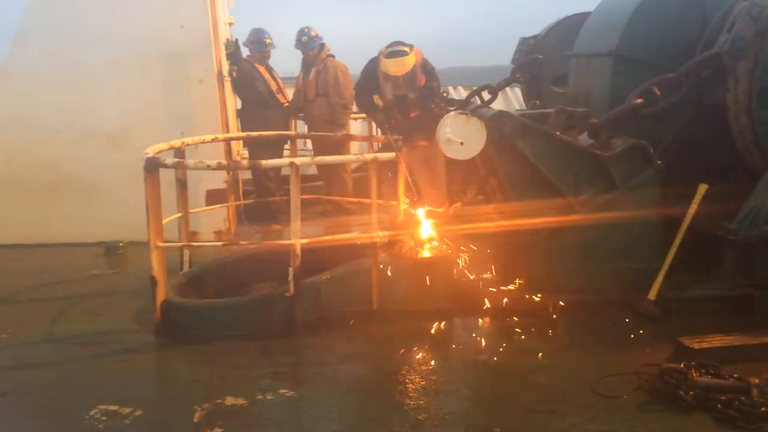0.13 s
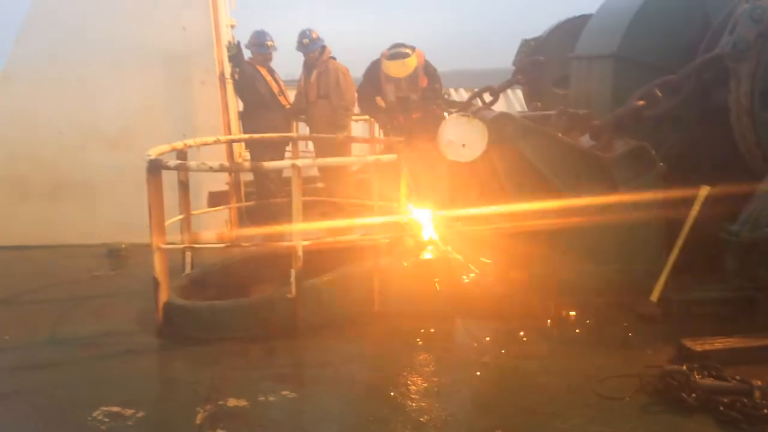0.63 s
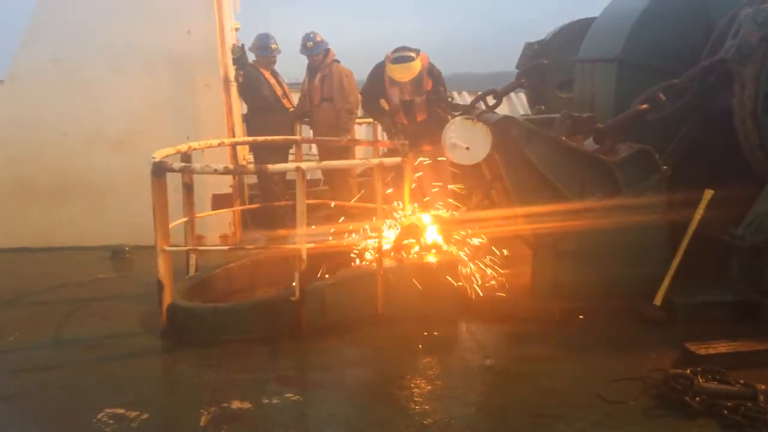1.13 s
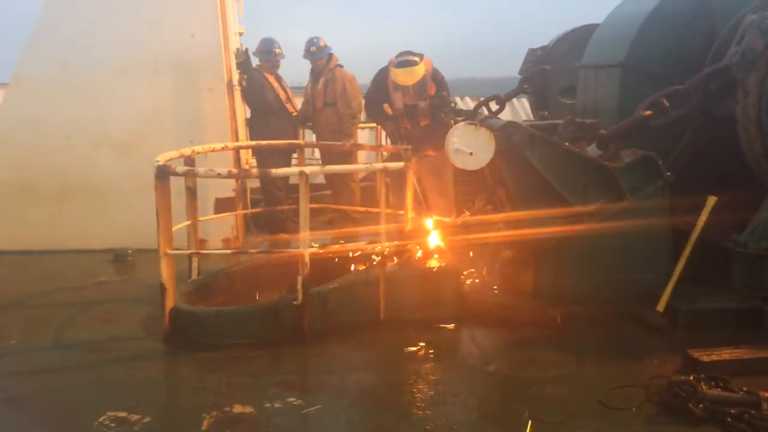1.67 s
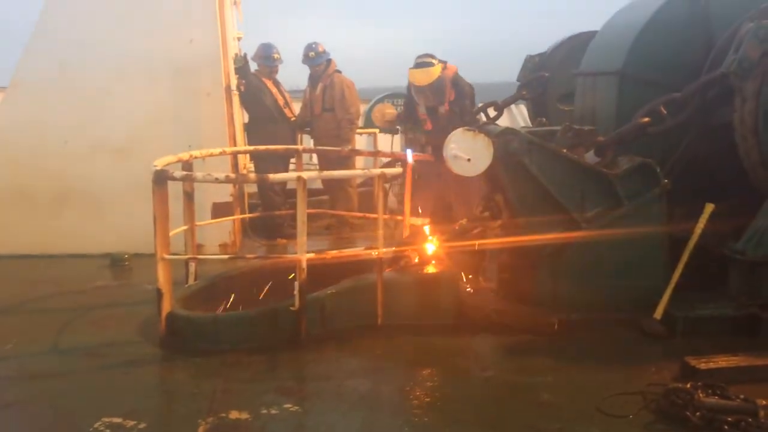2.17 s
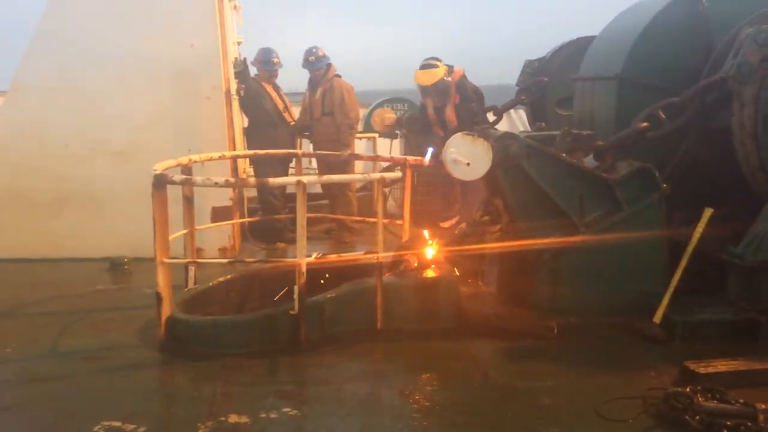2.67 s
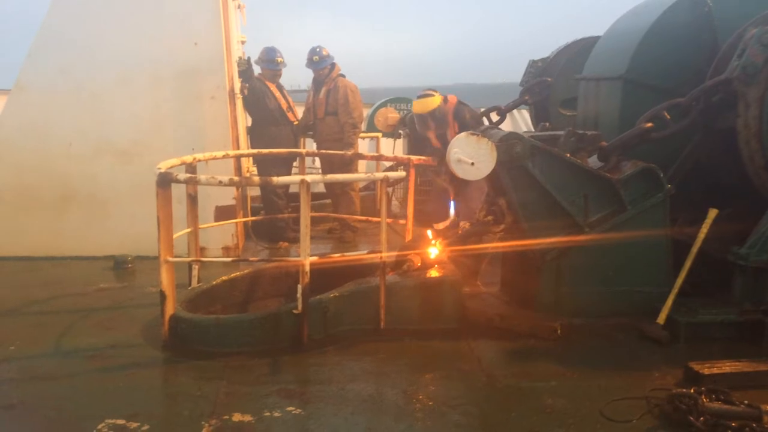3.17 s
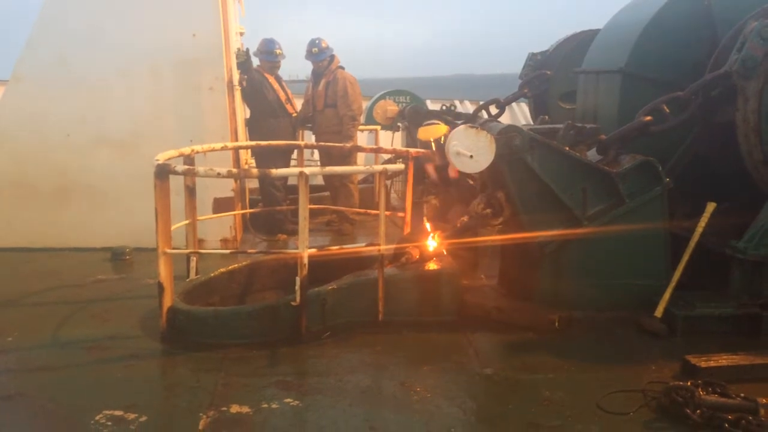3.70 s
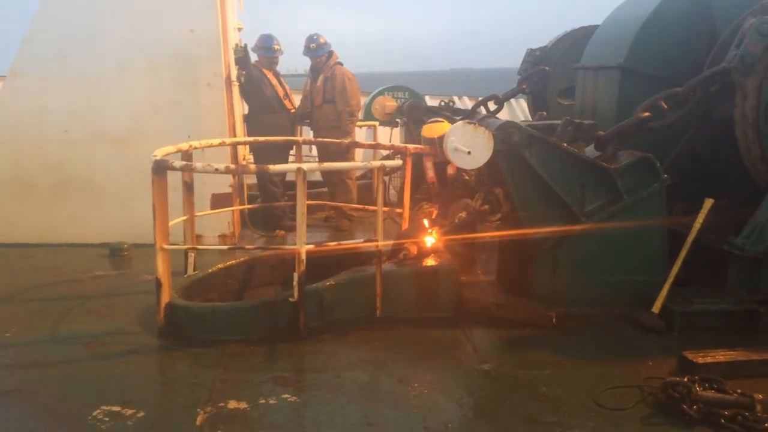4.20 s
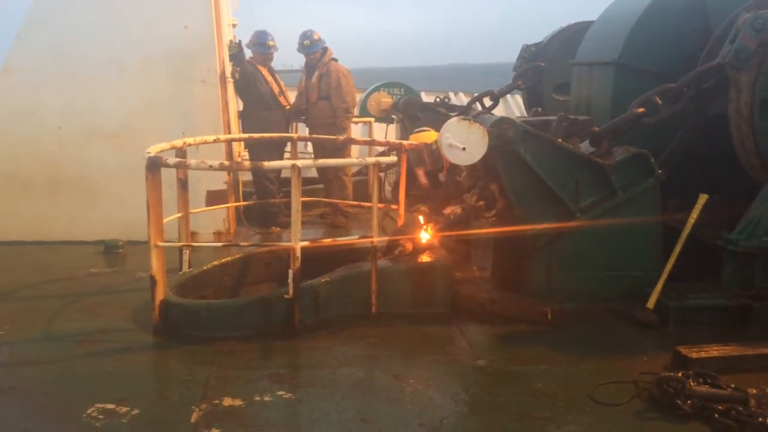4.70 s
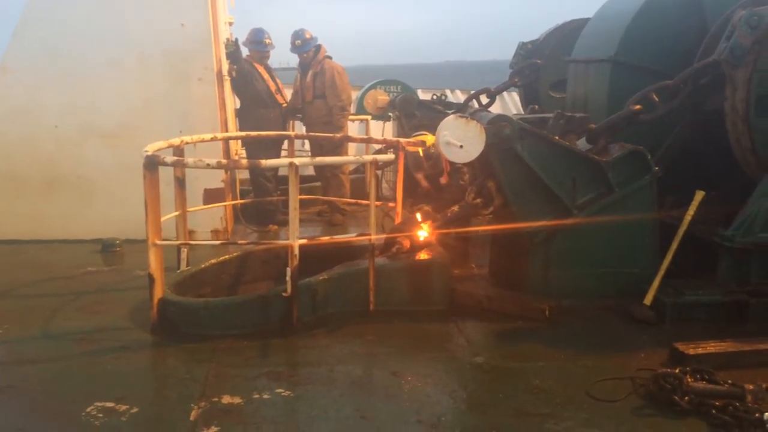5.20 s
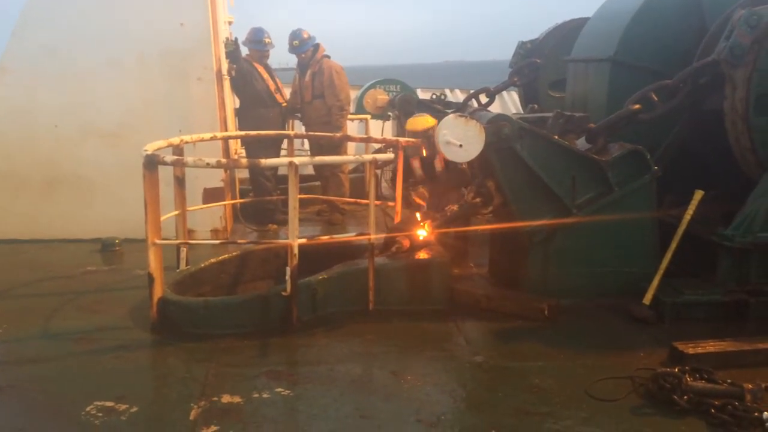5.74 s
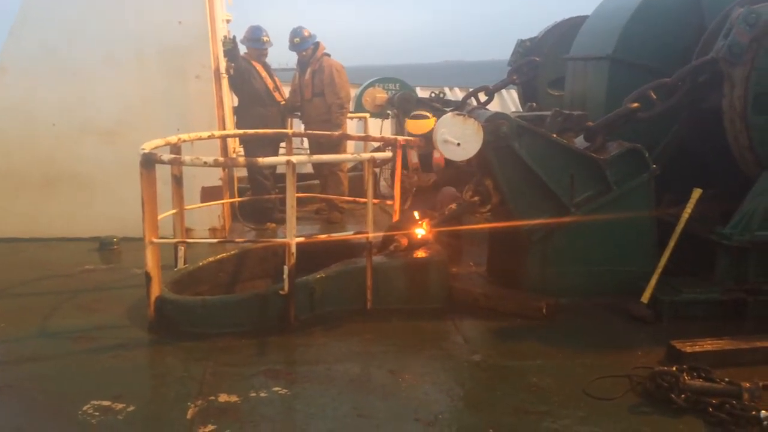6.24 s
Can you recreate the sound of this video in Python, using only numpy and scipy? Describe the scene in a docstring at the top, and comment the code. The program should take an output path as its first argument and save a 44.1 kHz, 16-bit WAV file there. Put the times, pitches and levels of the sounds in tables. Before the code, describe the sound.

A gas cutting torch is already roaring at 0 s on an open ship deck: loud, continuous turbulent hiss, strongest around 3 kHz, band-limited and mono, with hollow comb colouring from the steel and a short scattered echo. It flutters quickly, with small flares around 0.2, 0.4, 0.8 and 1.1 s and a broader swell near 1.7 s. At about 2.0 s it jumps louder, with a strong flare at 2.3 s, as the torch is lifted and swung; its hollow tone slides. From 3 to 5 s it is somewhat softer and duller, still wavering. Low wind rumble and soft thumps come in irregular gusts, heavy around 0.7-1.0, 1.8-2.3 and 3.7-4.4 s. At 5.22 s the flame snaps out with a tiny pop, a brief thin gas bleed and quick echo decay. Then only low wind buffets and very faint sea and machinery wash remain, with a tiny metal tick at 6.34 s.

```python
"""Open steel deck: a gas torch roars, is lifted and swung about, then snaps out with a pop; a metal tick follows.
The jet is shaped noise, combed by its bounce off the deck, with a sparse tail of echoes from the steel.
Wind is lumpy low noise plus single eddies; sea and machinery are a faint, patchy noise wash.
A small mono microphone, whose port rings near 3 kHz, colours all but the wind."""
import sys
import numpy as np
from scipy import signal
from scipy.io import wavfile
from scipy.ndimage import uniform_filter1d

SR = 44100
rng = np.random.default_rng(int(sys.argv[2]) if len(sys.argv) > 2 else 0)


def linear_from_db(decibels):
    """Turn decibels (scalar or array-like) into linear amplitude factors; 0 gives 1."""
    return 10 ** (np.asarray(decibels, float) / 20)


def store_pcm(level_fs):
    """Save levels as 16-bit WAV."""
    pcm = np.round(np.clip(level_fs, -1, 1) * 32767).astype(np.int16)
    wavfile.write(sys.argv[1], SR, np.atleast_2d(pcm).T)


N = 280476


def evened(x):
    """Scales to rms 1."""
    return x / np.sqrt(np.mean(x ** 2) + 1e-20)


def read(points, hz):
    """Interpolates a spectrum on a log-frequency axis."""
    f, value = np.transpose(points)
    return np.interp(np.log(hz + 1), np.log(f + 1), value)


def follow(rows, t):
    """Columns of a curve at times t."""
    s, *columns = np.transpose(rows)
    return [np.interp(t, s, c) for c in columns]


def grid(size):
    """Frequencies (column) and frame times (row) of short-time spectra."""
    hz = np.fft.rfftfreq(size, 1 / SR)[:, None]
    t = np.arange(4 * N // size + 5) * size / 4 / SR
    return hz, t


def blotches(hz, t, width_hz, length_s):
    """Random field of rms 1 with patches of the given size."""
    field = rng.standard_normal((len(t), len(hz))).T
    field = uniform_filter1d(field, max(1, round(width_hz / hz[1, 0])), 0)
    return evened(uniform_filter1d(field, max(1, round(length_s / t[1])), 1))


def noise(magnitude):
    """Noise whose short-time spectra have this magnitude; flat 1 gives rms 1."""
    real, imag = rng.standard_normal(magnitude.shape[::-1] + (2,)).T
    white = real + 1j * imag
    size = 2 * len(magnitude) - 2
    _, both = signal.istft([white, white * magnitude], nperseg=size, noverlap=3 * size // 4)
    flat, shaped = both[:, :N]
    return shaped / flat.std()


# flame flares: t/s (centre), lift/dB, half length/s (to 1/e), extra treble/dB
FLARES = [(0.123, 1, 0.071, 7), (0.196, 5, 0.034, -10.5), (0.413, 3, .03, -3), (.48, 3.5, 0.075, 0),
          (0.615, 2, 0.046, -1), (0.785, 3, 0.041, -4), (1.112, 4.5, 0.058, 0.5), (1.35, 3, .05, -1),
          (1.66, 3.5, 0.21, -4), (2.075, 1.5, 0.037, .1), (2.278, 7.5, 0.045, -8), (2.367, .5, 0.036, 4),
          (2.6, 1, 0.06, -1), (2.81, 3.5, 0.056, 3.5), (2.9, 1, .05, 1.5), (3.2, 2.5, 0.045, 0),
          (3.353, 2.5, .1, 2.5), (3.627, 3.5, 0.082, -1), (4.004, -0.5, .06, 1), (4.501, 2.5, 0.05, -2),
          (4.88, -1, .04, 0)]
# band response: dB per dB of aim, dB per dB of roar, share of a flare missed (0-1)
ROAR, MIDDLE, UPPER, TREBLE = (-0.65, 1.01, 1), (-0.2, 0.35, 0.34), (0.6, .1, .1), (0.5, 0.19, .01)


def jet_gain_db(hz, t, level_db, aim_db, roar_db):
    """Jet spectrum over time: flares lift it, aim and roar recolour four bands."""
    s, lift_db, half_s, treble_db = np.transpose(FLARES)[:, :, None]
    bump = np.exp(-((t - s) / half_s) ** 2)
    flare_db = (lift_db * bump).sum(0)

    def bell(centre_hz, width):
        return np.exp(-(np.log(hz / centre_hz + 0.014) / width) ** 2)

    high = 1 / (1 + (6000 / (hz + 1)) ** 4)
    low = 1 / (1 + (hz / 1700) ** 4)
    bands = [(high, TREBLE), (low, ROAR), (bell(2200, 0.28), MIDDLE), (bell(4500, 0.24), UPPER)]
    colour_db = high * (treble_db * bump).sum(0)
    for band, (aimed, roaring, missed) in bands:
        colour_db = colour_db + band * (aimed * aim_db + roaring * roar_db - missed * flare_db)
    return level_db + flare_db + colour_db


# jet drive: t/s, level/dB, aim/dB (towards us bright, away dull), roar/dB (flame against steel)
JET = [(0, -25.5, 2, -4), (.3, -27, 1.3, 2.5), (.6, -25.5, 0.93, -2), (.9, -27.5, 1.3, 0.5),
       (1.5, -26.5, 0.1, 0.5), (1.93, -28.5, -0.71, -1), (2.04, -22, -0.74, 0), (2.2, -23.5, 1.1, 0.5),
       (2.45, -25.5, .5, -1), (2.95, -26.5, 0.5, 0.5), (3.1, -27.5, 0.1, 0), (3.55, -29, -0.49, 3.5),
       (3.85, -29, -0.23, 1.4), (4.2, -28.5, -1.5, 1.5), (4.75, -27.5, -2.3, -0.4), (5.05, -28.5, -2, 6),
       (5.21, -28.5, -0.73, .1)]
# deck bounce, set by tip height: t/s, extra path/ms, share of direct sound (0-1)
BOUNCE = [(0, 0.9, 0.53), (.3, 0.95, .2), (1.1, 0.85, 0.25), (1.85, 0.82, 0.12), (2.05, 1.1, 0.5),
          (2.3, 1.75, 0.34), (2.55, 1.66, 0.7), (2.72, 1.6, 0.25), (2.9, 1.63, .55), (3.1, 1.45, 0.5),
          (3.3, 1.09, 0.5), (3.45, 0.9, 0.32), (3.7, 0.86, 0.2), (3.9, 1.1, 0.02), (4.12, 1.35, 0.22),
          (4.3, 1.08, 0.3), (4.55, 0.87, 0.02), (4.95, 0.6, 0.25)]
BOUNCE_HZ = 2920  # the rough deck scatters what lies above
SHUT_S = 5.222  # flame out
BLEED_DB, BLEED_S = -2.5, 0.027  # gas left in the nozzle; gain on the twice-differenced hiss


def jet():
    """Turbulent hiss, combed by its bounce off the deck, fluttering as the flame tears."""
    hz, t = grid(size=512)
    gain_db = jet_gain_db(hz, t, *follow(JET, t))
    tearing_db = 0.8 * blotches(hz, t, 400, .12)
    tearing_db += 0.63 * blotches(hz, t, 8000, .012)
    tearing_db += 0.98 * blotches(hz, t, 1500, .05)
    path_ms, share = follow(BOUNCE, t)
    reflected = share / (1 + (hz / BOUNCE_HZ) ** 2)
    comb = abs(1 + reflected * np.exp(-2j * np.pi * hz * path_ms / 1000))
    hiss = noise(comb * linear_from_db(gain_db + tearing_db))
    after_s = np.arange(N) / SR - SHUT_S
    thin = np.diff(hiss, n=2, prepend=[0, 0])  # thin and bright
    bleed_fade = np.sqrt(np.clip(1 - after_s / BLEED_S, 0, 1)) * (after_s > 0)
    flame = hiss * np.clip(-after_s / 0.0021, 0, 1)
    return flame + thin * linear_from_db(BLEED_DB) * bleed_fade


YARD_DB, YARD_T60_S = -4.5, 0.22  # tail energy re dry; decay before treble tilt
SHIFT_S = 0.2483  # torch motion changes the echo pattern in this time


def deck(x):
    """Adds a sparse tail of echoes, drawn anew for each stretch of the torch's motion."""
    out = np.pad(x, (0, 2 * SR))
    hop, t = round(SHIFT_S * SR), np.arange(SR // 4) / SR
    fade = np.sqrt(np.hanning(2 * hop))
    padded = np.pad(x, 2 * hop)
    for start in range(-hop, N, hop):
        echoes = rng.choice([-1., 1.], len(t)) * (rng.random(len(t)) < 5000 / SR)  # about 5000 per s
        decay = (t > .002) * linear_from_db(-60 * t / YARD_T60_S)
        tail = signal.lfilter([1, -.2], 1, echoes * decay)  # small steel parts favour treble
        tail = linear_from_db(YARD_DB) * tail / np.linalg.norm(tail)
        part = padded[start + 2 * hop:][:2 * hop] * fade
        wet = signal.fftconvolve(part, tail)[max(0, -start):]
        out[max(0, start):][:len(wet)] += wet
    return out[:N]


# microphone port response to broad hiss: f/Hz, relative level/dB
PORT = [(180, -37.5), (300, -21), (434, -21), (476, -15), (608, -15), (1330, -9.5), (1550, -8),
        (2110, -7.5), (3010, 0), (3300, 0.5), (3560, -1), (3840, -6.5), (4770, -10.5), (5910, -18.5),
        (11800, -35), (15300, -63), (22000, -120)]


def port(x):
    """Minimum-phase colour of the microphone port, unit energy: white noise keeps its power."""
    gain_db = np.maximum(read(PORT, abs(np.fft.fftfreq(4096, 1 / SR))), -100)
    log_gain = np.log(linear_from_db(gain_db))
    taps = np.fft.ifft(np.exp(np.conj(signal.hilbert(log_gain)))).real[:2048]
    return signal.oaconvolve(x, taps / np.linalg.norm(taps))[:N]


# far sea and machinery, before tilt and port: t/s, level/dB
WASH = [(5.3, -53.5), (5.39, -51), (5.6, -52.5), (5.645, -50.5), (5.77, -55.5), (6.3, -55)]
# wash spectrum before the port: f/Hz, level/dB
WASH_TILT = [(250, 18), (500, 19), (1000, 8.5), (2000, 3.5), (4000, -0.5), (8000, 3), (12000, 4.5)]


def wash():
    """Smooth distant noise, a little patchy."""
    hz, t = grid(size=1024)
    level_db, = follow(WASH, t)
    patches_db = 0.5 * blotches(hz, t, 600, 0.031)
    return noise(linear_from_db(level_db + read(WASH_TILT, hz) + patches_db))


# gusts: t/s (start), length/s, level/dB (at start, before rumble trim), upper rumble lift/dB
GUSTS = [(0, 0.39, -35.5, 3.5), (.38, 0.093, -30, -4), (.48, .12, -37.5, 1), (0.636, 0.39, -28.5, -3),
         (1.098, 0.05, -30.5, -15), (1.397, .1, -36, -2), (1.55, .14, -33, -9), (1.817, 0.16, -28, .5),
         (2.059, 0.27, -27, -6.5), (2.74, 0.043, -29.5, -9.5), (2.9, 0.16, -38.5, 2),
         (3.08, 0.13, -34.5, -6), (3.25, 0.26, -38, 5), (3.496, 0.11, -29.5, -13), (3.702, 0.19, -24.5, 1),
         (3.903, 0.25, -28.5, 7), (4.177, 0.17, -25.5, 3), (4.357, .07, -30, -2), (4.486, 0.075, -27, -3),
         (4.71, 0.39, -37, 11), (5.134, 0.52, -28.5, -2), (5.67, 0.24, -30, -8), (5.917, 0.19, -36, -4.5),
         (6.178, 0.12, -38.5, -2), (6.313, .1, -35, -5)]
CALM_DB, CALM_LIFT_DB = -41.5, -2  # breeze between gusts (before rumble trim), its upper rumble
GUST_RISE_S, GUST_FALL_S, GUST_SAG_DB_PER_S = 0.054, 0.063, 4.5


def gusts(t):
    """Wind level and upper rumble lift, dB: each gust rises, sags and falls back to the breeze."""
    s, length_s, db, lift_db = np.transpose(GUSTS)[:, :, None]
    rise = (t - s) / GUST_RISE_S + .5
    fall = (s + length_s - t) / GUST_FALL_S + .5
    on = np.clip(np.minimum(rise, fall), 0, 1)
    over_calm_db = db - GUST_SAG_DB_PER_S * (t - s) - CALM_DB
    level_db = CALM_DB + (on * over_calm_db).sum(0)
    return level_db, CALM_LIFT_DB + (on * (lift_db - CALM_LIFT_DB)).sum(0)


# rumble's upper edge rises with the gust: faster air makes smaller eddies
CORNER_HZ, CORNER_DB_PER_DB = 150.4, 0.14


def rumble():
    """Wind turbulence: low noise with lumpy pressure swings, following the gusts."""
    hz, t = grid(size=1024)
    level_db, lift_db = gusts(t)
    corner_hz = CORNER_HZ * linear_from_db(CORNER_DB_PER_DB * (level_db - CALM_DB))
    upper_db = lift_db / (1 + (130 / (hz + 1)) ** 4)
    patches_db = 1.6 * blotches(hz, t, 130, .04)
    shape = linear_from_db(upper_db + patches_db) / (1 + (hz / corner_hz) ** 4.06)
    shape /= np.sqrt((shape ** 2).mean(0))
    slow = signal.lfilter(*signal.butter(2, 25, fs=SR), rng.standard_normal(N))
    lumps_db = 3 * evened(slow)
    return noise(shape * linear_from_db(level_db - 4)) * linear_from_db(lumps_db)  # -4 dB: rumble trim


# single buffets: t/s (centre), peak/dB, f/Hz
BUFFETS = [(0.415, -34, 89), (0.653, -25.5, 86), (0.697, -28, 102), (0.722, -21, 168), (0.741, -27, 165),
           (0.768, -30, 115), (0.823, -26.5, 135), (0.905, -23.5, 124), (0.934, -19.5, 133),
           (0.968, -33, 101), (1.011, -30, 90), (1.841, -23, 162), (1.908, -27, 100), (1.932, -24.5, 173),
           (2.089, -22, 109), (2.143, -21, 115), (2.196, -22.5, 132), (2.213, -27, 101),
           (2.276, -20.5, 121), (2.314, -25, 141), (3.534, -27.5, 80), (3.735, -25, 72), (3.751, -22.5, 59),
           (3.766, -23, 168), (3.789, -19, 192), (3.829, -23.5, 81.6), (3.962, -22, 176), (3.99, -21, 205),
           (3.999, -27, 420), (4.012, -19, 211), (4.022, -25, 557), (4.023, -19, 480), (4.029, -19, 220),
           (4.047, -22.5, 450), (4.05, -20, 162), (4.085, -25, 101), (4.213, -27, 123), (4.235, -26.5, 393),
           (4.241, -23, 101), (4.264, -29, 380), (4.283, -21, 122), (4.311, -25.5, 100),
           (4.387, -31.5, 251), (5.161, -29, 105), (5.233, -23, 108.3), (5.322, -25.5, 94.5),
           (5.398, -27, 115), (5.428, -38, 400), (5.435, -30, 124), (5.517, -26, 122), (5.597, -22, 101),
           (5.62, -38, 420), (5.711, -26, 98), (5.821, -21, 66.6), (5.869, -33, 122), (5.97, -39, 90),
           (6.053, -34.8, 95), (6.346, -32, 99.2)]
BUFFET_TURNS, TURNS_SPREAD = 1.63, 0.17  # cycles in an eddy; scatter as a fraction


def buffets():
    """Single eddies that slap the port: short sine bursts under a bell envelope."""
    out = np.zeros(N)
    for (s, db, pitch_hz), (phase, size) in zip(BUFFETS, rng.random((len(BUFFETS), 2))):
        cycles = BUFFET_TURNS * (1 + TURNS_SPREAD * (2 * size - 1))
        turns = np.arange(-1.5 * cycles, 1.394 * cycles, pitch_hz / SR)
        angle = 2 * np.pi * (turns + phase)
        wave = np.sin(angle + 0.21 * np.sin(angle))  # fronts steepen a little
        eddy = np.exp(-2.8 * (turns / cycles) ** 2) * wave
        part = out[round(s * SR) - len(turns) // 2:][:len(turns)]
        part += linear_from_db(db) * eddy[:len(part)]
    return out


# pop of the dying flame, small tick of metal: t/s, level/dB (before deck and port), f/Hz, t60/s
TICKS = [(5.2207, -20, 3000, .002), (6.343, -41, 3350, .011)]


def ticks():
    """Short knocks, each a damped ring."""
    out, t = np.zeros(N + 2000), np.arange(1200) / SR
    for s, db, ring_hz, t60_s in TICKS:
        ring = linear_from_db(db - 60 * t / t60_s) * np.sin(2 * np.pi * ring_hz * t)
        out[round(s * SR):][:len(t)] += ring
    return out[:N]


def scene():
    """Airborne sound takes the port's colour; wind presses on the capsule directly."""
    airborne = deck(jet() + ticks()) + wash()
    mono = port(airborne) + rumble() + buffets()
    return np.array([mono, mono])


def top_cut(x):
    """Nothing passes above the cut-off."""
    return signal.sosfilt(signal.butter(12, 12860, fs=SR, output="sos"), x)


def record(dry):
    """Bass cut at 48 Hz, then band limit at 12150 Hz."""
    bass_cut = signal.butter(3, 48, "high", fs=SR, output="sos")
    band_limit = signal.firwin(1023, 12150, window=("kaiser", 9), fs=SR)
    mix = signal.sosfilt(bass_cut, dry)
    mix = signal.oaconvolve(mix, band_limit[None], "same")
    return top_cut(mix)


dry = scene()
out = record(dry)
store_pcm(out)
```